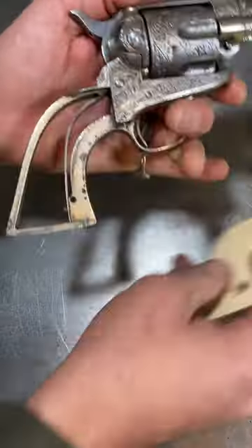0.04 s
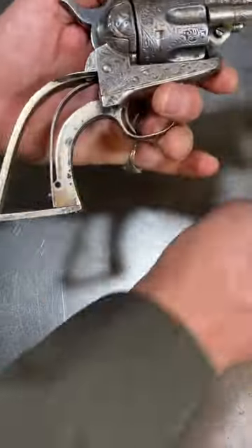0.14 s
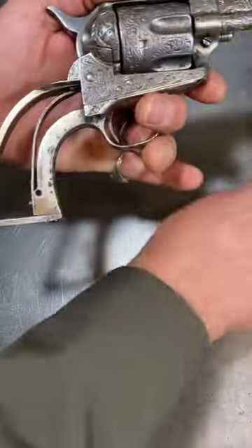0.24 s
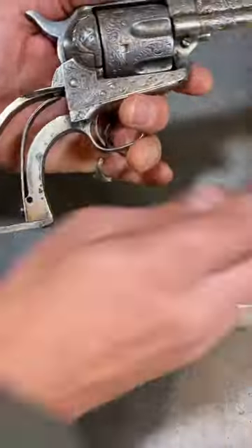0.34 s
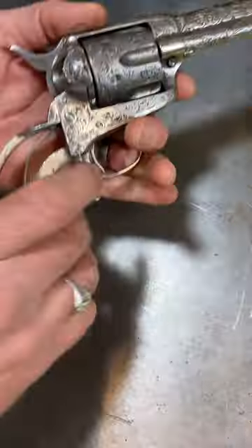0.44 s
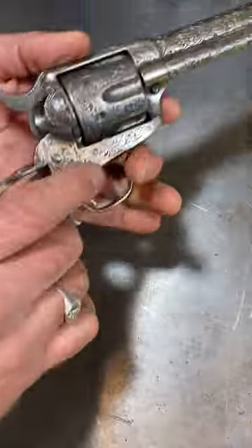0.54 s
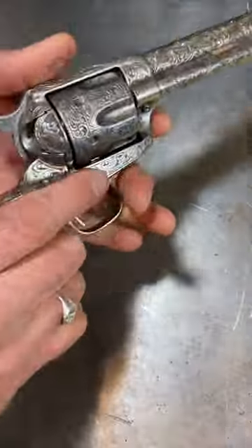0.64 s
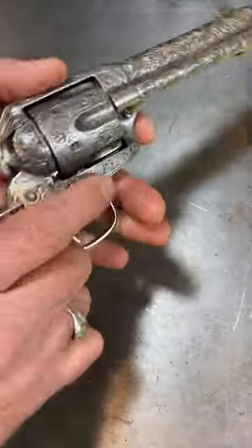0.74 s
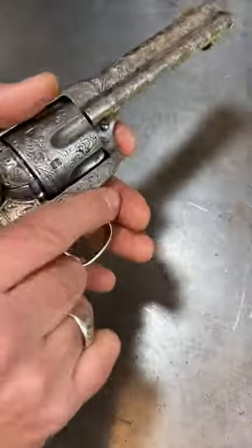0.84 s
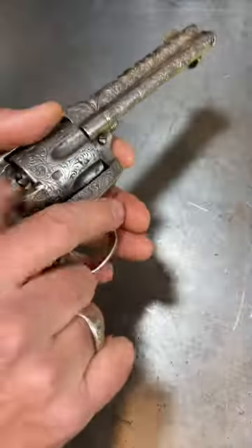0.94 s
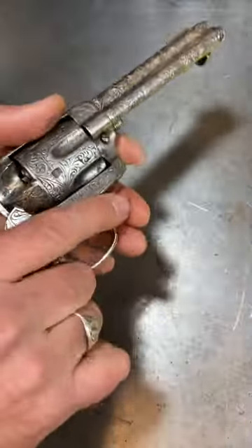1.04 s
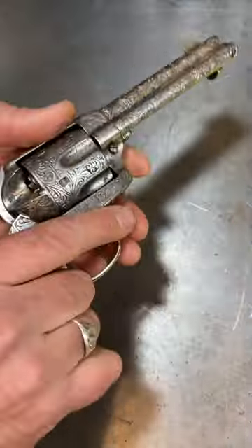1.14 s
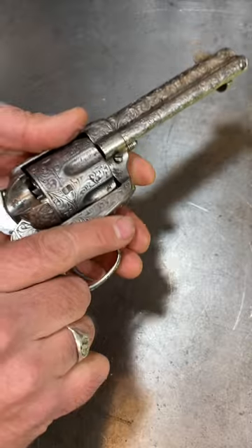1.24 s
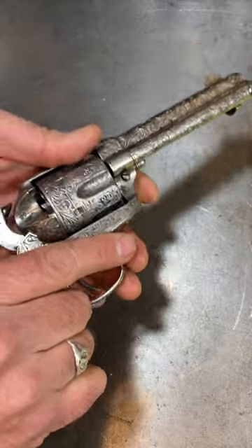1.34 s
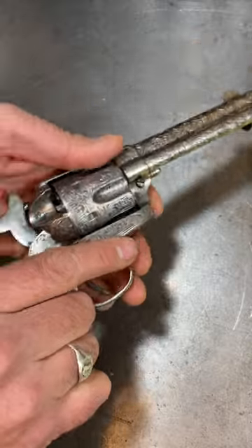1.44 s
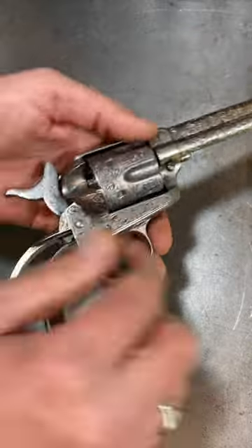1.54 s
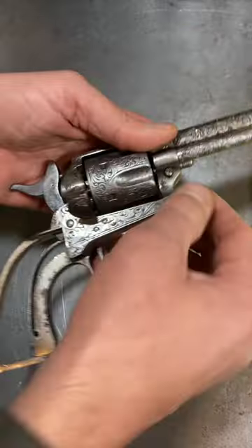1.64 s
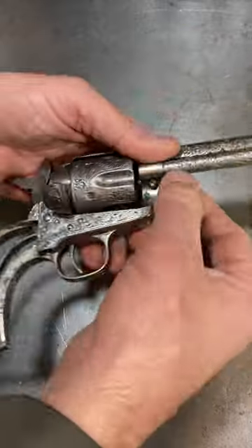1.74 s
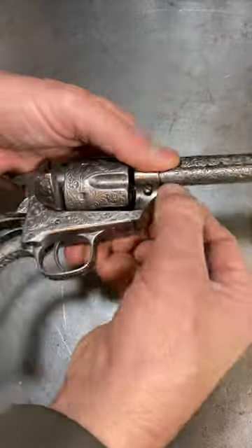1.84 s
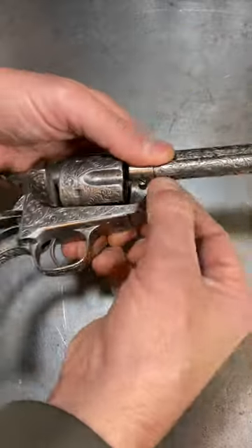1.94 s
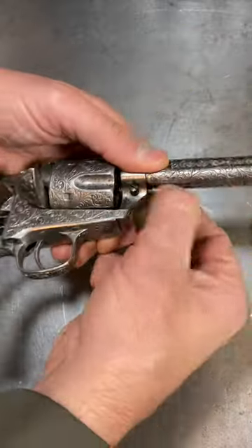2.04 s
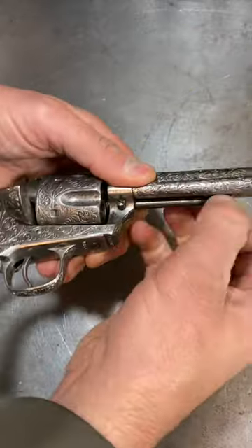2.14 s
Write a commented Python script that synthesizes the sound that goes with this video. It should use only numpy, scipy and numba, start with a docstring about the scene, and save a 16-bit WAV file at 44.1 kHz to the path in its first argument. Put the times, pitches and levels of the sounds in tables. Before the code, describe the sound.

Revolver disassembly, heard close in stereo in a small workshop with faint low hum. Sleeve cloth swishes; at 0.2 s a part smacks a steel bench with a short damped clatter, slightly right. Sharp, bright lockwork snaps at 0.9, 1.17 and 1.35 s, with fainter ticks between and soft hand bumps. Cloth brushes at 1.6 s with a light tick; from 2.0 s a pin scrapes out in faint, thin metallic strokes.

```python
"""A hum and a swishing sleeve open the scene: a revolver is taken apart by hand in a small workshop.
A part thuds on a steel bench: a hard smack, damped bench modes and a dense noise clatter.
The hand-damped lockwork snaps three times with lighter ticks between: noise cracks plus frame modes.
A steel pin slides out of the frame: short strokes of hiss that drive its resonances.
Soft bumps of the hands, room noise and a low rumble fill the rest."""
import sys
import numpy as np
from scipy import signal
from scipy.fft import rfft, irfft
from scipy.io import wavfile
from scipy.ndimage import uniform_filter1d
from numba import njit

SR = 44100
rng = np.random.default_rng(int(sys.argv[2]) if len(sys.argv) > 2 else 0)


def to_wav(s):
    """Save 16-bit WAV."""
    ch = np.atleast_2d(s).T  # columns
    pcm = np.round(np.clip(ch, -1, 1) * 32767)  # PCM
    wavfile.write(sys.argv[1], SR, pcm.astype(np.int16))


N = 97020
T = np.arange(N) / SR
HZ = np.maximum(np.fft.rfftfreq(N, 1 / SR), 1)


def undb(db):
    """Decibels to gain."""
    return 10 ** (np.asarray(db) / 20)


def unit(x):
    """Scale to rms 1."""
    return x / np.sqrt(np.mean(x ** 2))


def blow(x):
    """Scale to mean channel energy 1."""
    return unit(x) / np.sqrt(N)


def over_hz(points):
    """Join (f/Hz, value) points on a log-frequency axis."""
    hz, value = np.array(points).T
    return np.interp(np.log(HZ), np.log(hz), value)


def over_time(points):
    """Join (t/s, value) points linearly."""
    s, value = np.array(points).T
    return np.interp(T, s, value)


def colour(x, points):
    """Minimum-phase filter through (f/Hz, gain/dB) points, by folding the cepstrum."""
    cepstrum = irfft(np.log(undb(over_hz(points))), N)
    fold = 1 + np.sign(N / 2 - np.arange(N))
    fold[0] = 1
    response = np.exp(rfft(cepstrum * fold))
    return irfft(rfft(x) * response, N)


def low_cut(x, hz):
    """Third-order high-pass."""
    return signal.sosfilt(signal.butter(3, hz, "high", fs=SR, output="sos"), x)


@njit
def band(x, hz, share):
    """State-variable band-pass with moving centre and width (share of centre)."""
    y, b, l = np.empty(len(x)), 0., 0.
    for i in range(len(x)):
        g = np.tan(np.pi * hz[i] / SR)
        v = (b + g * (x[i] - l)) / (1 + g * (g + share[i]))
        b, l, y[i] = 2 * v - b, l + 2 * g * v, share[i] * v
    return y


def resonance(hz, width_hz):
    """Complex response of one resonance, 1 at its centre."""
    return 1 / (1 + 1j * (HZ ** 2 - hz ** 2) / (HZ * width_hz))


def pan(x, right_db):
    """Lean a stereo sound to the right."""
    return x * undb(right_db * np.array([[-1], [1]]) / 2)


def fade(t60_s):
    """Exponential decay, -60 dB at t60_s."""
    return np.exp(-np.log(1000) * T / t60_s)


def ring_mode(hz, db, t60_s):
    """Decaying sine of one struck mode."""
    return undb(db) * fade(t60_s) * np.sin(2 * np.pi * hz * T)


def place(x, s):
    """Delay channel rows to a start time."""
    return np.pad(x, ((0, 0), (int(s * SR), 0)))[:, :N]


def flutter(rate_hz):
    """Smooth random wander with rms 1: noise averaged twice over 1 / rate_hz."""
    size = max(int(SR / rate_hz), 1)
    return unit(uniform_filter1d(uniform_filter1d(rng.standard_normal(N), size), size))


def swell(s, rise_s, fall_s, db):
    """Level of one stroke: Gaussian rise and fall."""
    return undb(db) * np.exp(-((T - s) / np.where(T < s, rise_s, fall_s)) ** 2)


def swells(rows):
    """Overlapping strokes, added in power."""
    return np.sqrt(sum(swell(*row) ** 2 for row in rows))


# left-right correlation of the noise, opposed in the top band: f/Hz, correlation (clipped to -1..1 in use)
NOISE_CORRELATION = [(25, 1), (60, 1), (250, 0.94), (500, 0.59), (800, 0.38), (1500, -0.16), (3000, 0.12),
                     (6000, 0.094), (10500, .5), (12300, 0.023), (13300, -1.79)]


def diffuse():
    """White stereo noise with that left-right correlation, by weighting mid and side."""
    correlation = np.clip(over_hz(NOISE_CORRELATION), -1, 1)
    mid, side = rfft(rng.standard_normal((2, N))) * np.sqrt([1 + correlation, 1 - correlation])
    return unit(irfft(np.array([mid + side, mid - side]), N))


# machine hum: t/s, f/Hz, level/dB
MACHINE_HUM = [(0, 140.8, -55), (0.122, 138.8, -53), (0.43, 138.4, -53), (0.72, 139.5, -49),
               (1.0, 139.3, -53), (1.22, 137.3, -60.5), (1.4, 137.4, -68), (1.901, 136.2, -70),
               (2.2, 137.5, -57.5)]
# room noise spectrum: f/Hz, gain/dB
AIR_TONE = [(100, -1.5), (220, 0), (350, -4), (600, -6.5), (1200, -12.5), (3000, -13), (10000, -20.5),
            (16000, -16.5)]
# room noise and whine: t/s, level/dB
AIR_LEVEL = [(0, -59.5), (0.4, -56.5), (0.68, -65), (0.85, -57.5), (1.08, -68.5), (1.3, -75.5),
             (1.45, -63.5), (1.8, -77), (2.2, -64)]
# rumble spectrum: f/Hz, gain/dB
RUMBLE_TONE = [(25, -11.5), (50, -27), (100, 4), (150, 2.5), (220, -10.5), (500, -46)]
# rumble: t/s, level/dB
RUMBLE_LEVEL = [(0, -64.5), (0.6, -60), (1.15, -62), (1.5, -69), (2.2, -66.5)]
HUM_OCTAVE_DB = -23.5


def workshop():
    """Wavering two-partial hum and faint whine, over coloured room noise and low rumble."""
    s, hz, db = np.array(MACHINE_HUM).T
    phase = 2 * np.pi * np.cumsum(np.interp(T, s, hz)) / SR
    partials = np.sin(phase) + undb(HUM_OCTAVE_DB) * np.sin(2 * phase)
    hum = np.sqrt(2) * partials * undb(np.interp(T, s, db) + 0.33 * flutter(53))
    whine = 0
    for whine_hz, rel_db in [(479, -13.5), (614, -20)]:  # dB re room noise
        whine = whine + np.sin(2 * np.pi * whine_hz * T) * undb(rel_db + 2 * flutter(23))
    air = (unit(colour(diffuse(), AIR_TONE)) + whine) * undb(over_time(AIR_LEVEL))
    rumble = unit(colour(diffuse(), RUMBLE_TONE)) * undb(over_time(RUMBLE_LEVEL))
    return hum + air + rumble


# soft bumps of the hands on the gun: t/s, level/dB, f/Hz
HAND_BUMPS = [(0.109, -50.5, 217), (0.264, -42, 111), (0.575, -59, 100), (0.808, -55, 172),
              (0.902, -51, 99.2), (1.027, -43, 124.4), (1.052, -41.5, 99), (1.673, -56, 199)]
BUMP_S = 0.014  # Gaussian half-width at 1/e


def hands():
    """Dull bumps as the grip shifts: Gaussian-windowed low cosines."""
    out = 0
    for s, db, hz in HAND_BUMPS:
        window = np.exp(-((T - s) / BUMP_S) ** 2)
        out = out + undb(db) * window * np.cos(2 * np.pi * hz * (T - s))
    return out


# sleeve swishes: peak t/s, rise/s, fall/s, level/dB
SLEEVE_SWISHES = [(0.085, 0.046, 0.09, -47.5), (0.15, 0.055, 0.033, -47.5), (0.325, 0.083, 0.088, -47),
                  (0.86, 0.098, 0.094, -61.5), (1.47, 0.23, 0.27, -62.5), (1.60, 0.057, 0.056, -46.5),
                  (1.655, 0.055, 0.047, -51), (1.83, 0.13, 0.071, -65), (2.02, 0.097, 0.22, -64)]
# cloth hiss spectrum: f/Hz, gain/dB
CLOTH_TONE = [(100, -4), (220, 0.5), (450, -4.5), (900, -2), (1600, -2), (2700, -6), (4500, -3.5),
              (6000, -4.5), (10500, -3.5), (13000, -5), (16000, -23)]
# weave rasp, pitch follows the speed of the rub: t/s, f/Hz, level/dB, width/share of pitch (per pass)
WEAVE_RASP = [(0.02, 890.1, -90, 0.36), (0.079, 1510, -46, 0.76), (0.162, 1560, -51.5, 0.93),
              (0.27, 1300, -52.5, 0.7), (0.302, 1730, -48, 0.89), (0.312, 2400, -46, 0.17),
              (0.328, 2600, -49.5, 0.47), (0.349, 1910, -58, 0.46), (0.47, 1200, -75.5, .6),
              (1.44, 933, -91, 0.67), (1.577, 1415, -55.5, 0.32), (1.605, 1620, -51, 0.34),
              (1.649, 930, -55, 0.97), (1.67, 580, -64, 0.54), (1.74, 463, -82, .6)]
CLOTH_SCUFF_DB, SCUFF_HZ = 1.04, 78
SNAG_PER_S, SNAG_DB, SNAG_DECAY_S = 90, 4.5, 0.0016  # threads that catch and let go


def sleeve():
    """Cloth on cloth: noise roughened by scuffs and snags, plus a weave rasp in a gliding band."""
    catches = 1. * (rng.random(N) < SNAG_PER_S / SR)
    snags = signal.fftconvolve(catches, np.exp(-T / SNAG_DECAY_S))[:N]
    grain = undb(CLOTH_SCUFF_DB * flutter(SCUFF_HZ) + SNAG_DB * np.minimum(snags, 1))
    hiss = unit(colour(diffuse() * grain, CLOTH_TONE)) * swells(SLEEVE_SWISHES)
    s, *columns = np.array(WEAVE_RASP).T
    pitch_hz, db, share = (np.interp(T, s, column) for column in columns)
    rasp = np.array([band(band(x, pitch_hz, share), pitch_hz, share) for x in diffuse() * grain])
    even_rasp = unit(rasp / np.sqrt(pitch_hz * share))  # power evened over bandwidth
    return hiss + even_rasp * undb(db)


# part lands and rocks: t/s, level/dB, contact/s
BENCH_KNOCKS = [(0.2004, -21.5, 0.0002), (0.216, -17.5, 0.0015)]
# bench top modes: f/Hz, level/dB, t60/s
BENCH_MODES = [(106, -9, .25), (147, -6.5, 0.047), (178.6, -30, 0.84), (255.6, -3.5, 0.135),
               (321, -18.5, 0.21), (390.2, -16.5, 0.33), (417, -24, 0.066), (463, -16, 0.3),
               (568, -9.5, 0.12), (619, -25, 0.34), (698, -17, 0.23), (738, -26, 0.27), (812, -18.5, 0.23),
               (884, -30, .16), (957, -8, 0.08), (1105, -15, 0.13), (1137, -12, 0.11), (1287, -12.5, 0.11),
               (1406, -23, 0.1006), (1640, -15, 0.072), (1740, -12.5, 0.053)]
# clatter spectrum: f/Hz, gain/dB
CLATTER_TONE = [(50, -60), (100, -34), (250, 4.5), (600, -2), (1250, -1), (1750, -9.5), (2600, -16),
                (5000, -26), (10000, -24), (16000, -58)]
# first-touch crunch spectrum: f/Hz, gain/dB
CRUNCH_TONE = [(100, -4.5), (500, 20), (1200, -5), (2300, 10), (4000, -2), (10000, -4.5), (16000, -14)]
# hard first-touch spectrum: f/Hz, gain/dB
SMACK_TONE = [(150, -15), (500, -5), (1000, 5), (1700, 4.5), (2100, -19), (2600, 0), (3600, -29),
              (8000, -20), (16000, -38)]
# lean to the right: f/Hz, right re left/dB
BENCH_RIGHT = [(200, 1.5), (600, -0.5), (1200, 4), (2300, 5), (5000, -0.5)]
LANDS_S, SMACK_DB = .2003, -10.5
CRUNCH_DB, CRUNCH_T60_S = -5.5, 0.068
CLATTER_DB, CLATTER_T60_S, CLATTER_CENTRE_DB = -3.5, 0.16, -0.5
BENCH_CUT_HZ = 199  # the top radiates little below this


def bench():
    """Landing part: smack, crunch and clatter, with bench modes driven by half-sine contact pushes."""
    # random polarity for each mode spreads the ring's energy evenly
    signs = np.sign(rng.standard_normal(len(BENCH_MODES)))
    modes = sum(sign * ring_mode(*mode) for sign, mode in zip(signs, BENCH_MODES))
    ring = low_cut(modes, BENCH_CUT_HZ)
    spread = diffuse() + undb(CLATTER_CENTRE_DB) * rng.standard_normal(N)
    clatter = undb(CLATTER_DB) * blow(colour(spread * fade(CLATTER_T60_S), CLATTER_TONE))
    crunch = undb(CRUNCH_DB) * blow(colour(diffuse() * fade(CRUNCH_T60_S), CRUNCH_TONE))
    smack = undb(SMACK_DB) * blow(colour(signal.unit_impulse(N), SMACK_TONE))
    out = place(smack + clatter + crunch, LANDS_S)
    for s, db, contact_s in BENCH_KNOCKS:
        push = np.sin(np.pi * T[T < contact_s] / contact_s)
        knock = signal.fftconvolve(ring, push / push.sum())
        out = out + undb(db) * place(knock[None], s)
    return irfft(pan(rfft(out), over_hz(BENCH_RIGHT)), N)


# pin strokes: peak t/s, rise/s, fall/s, ring/dB, hiss/dB, strongest f/Hz
PIN_STROKES = [(2.024, 0.0014, .003, -59, -69, 2650), (2.0542, 0.002, 0.0016, -63, -61, 3472),
               (2.067, 0.018, 0.0058, -57, -52.5, 5400), (2.0704, .001, .002, -51, -55, 2900),
               (2.087, 0.01, 0.011, -50, -48.5, 6300), (2.104, 0.0064, 0.0041, -47.5, -48.5, 3150),
               (2.1114, 0.0025, 0.005, -52.5, -47.5, 4200), (2.122, .003, 0.0025, -56.5, -58, 3570),
               (2.1513, 0.0021, 0.0022, -51.5, -58, 2633)]
# pin resonances: f/Hz, width/Hz, level/dB
PIN_RESONANCES = [(2500, 91, 6.5), (3170, 370, -4), (3520, 130, -1.5), (4550, 220, 1), (4930, 130, -6),
                  (5740, 270, -6), (8200, 200, -6), (9170, 110, 4)]
# pin hiss spectrum: f/Hz, gain/dB
PIN_HISS_TONE = [(200, -14), (1500, 1), (5000, -8.5), (10000, -0.5), (13000, -4), (16000, 3)]
PIN_GRAIN_DB, GRAIN_HZ, PIN_DULL_HZ = 2, 1300, 9000
PIN_FOCUS_DB_PER_OCTAVE = 8  # fall away from a stroke's strongest pitch
PIN_DETUNE = 0.013  # rms share of random detuning of each resonance, per stroke


def pin():
    """Pin sliding in its bore: each grainy stroke hisses and excites its resonances in a new mix."""
    rub = unit(diffuse() * undb(PIN_GRAIN_DB * flutter(GRAIN_HZ)))
    hiss_rows = [(s, rise, fall, hiss_db) for s, rise, fall, _, hiss_db, _ in PIN_STROKES]
    out = colour(rub, PIN_HISS_TONE) * swells(hiss_rows)
    for s, rise, fall, ring_db, _, focus_hz in PIN_STROKES:
        detunes = 1 + PIN_DETUNE * rng.standard_normal(len(PIN_RESONANCES))
        body = 0
        for (hz, width_hz, db), detune in zip(PIN_RESONANCES, detunes):
            body = body + undb(db) * resonance(hz * detune, width_hz)
        focus = undb(-PIN_FOCUS_DB_PER_OCTAVE * abs(np.log2(HZ / focus_hz)))
        body = body * focus / (1 + (HZ / PIN_DULL_HZ) ** 2)
        body = body / np.sqrt(np.mean(abs(body) ** 2))
        drive = rub[0] * swell(s, rise, fall, ring_db)
        out = out + irfft(rfft(drive) * body, N)
    return out


# crack before its spectrum is flattened; reshaping then alters the decay
CRACK_DB, CRACK_SEED_RISE_S, CRACK_SEED_T60_S = -1.5, 0.00018, .008


def even_burst(t60_s, count=6):
    """Short noise burst, repeatedly whitened and re-windowed so that it favours no pitch."""
    size = int(.012 * SR)
    shape = (fade(t60_s) * (1 - np.exp(-T / CRACK_SEED_RISE_S)))[:size]
    x = rng.standard_normal(size) * shape
    for _ in range(count):
        white = irfft(np.exp(1j * np.angle(rfft(x))), size)
        x = white * np.sqrt(shape)
    return blow(np.pad(x, (0, N - size)))


# lockwork clicks: t/s, level/dB, room re direct/dB, then gain/dB at:
# body 1150 Hz, knock 2450 Hz, rings 3200, 4200, 5600 Hz, edge 9900 Hz, sheen 12300 Hz, top 15000 Hz
LOCK_CLICKS = [(0.8906, -1.5, -12, -3, -14.5, -2, -12.5, -4.5, 12.5, 10.5, 10),
               (0.9569, -30, -1, 6.5, -11, 9.5, 9, 1, 2, 0.5, 3),
               (0.9693, -41, -14, -5, -10, 10, 19, -4, -5, -10, -19),
               (1.166, -2.5, -11, -9.5, -8, -9.5, 4, -3, -4, 3.5, 2.5),
               (1.1730, -22, -17, -33, -3, -15, 0, 1, -2, -7, -8),
               (1.2525, -41, -3, 1, 11, -9, 9, -5, -20, -12, -13),
               (1.3372, -26, -31.5, -22, -20, -24, -11, -5, -3, -6, 1),
               (1.3504, 1, -14, -15, -10, -12.5, -5, -3.5, -13, -3.5, -3.5),
               (1.4155, -35, -13, -18, -12, -6, -10, 3, -3, 6, 7),
               (1.4190, -17, -18, -0.5, -15, -18, -16, -0.5, -9, -15, -14),
               (1.6007, -17, -5, -6, -28, -15, 8, 1, -2, -3, -18.5),
               (1.8435, -40, 3.5, -21, 11.5, 13.5, 10.5, 8, -0.5, 10, 2)]
# frame and cylinder modes, damped by the hand: f/Hz, level/dB, t60/s
FRAME_MODES = [(2446, -16.5, 0.025), (3120, 1.5, 0.007), (3555, 2.5, 0.0077), (4050, -3.5, 0.01),
               (4700, -8, 0.0076), (5370, -9, 0.013), (6250, -10.5, 0.02), (7030, -7.5, 0.016),
               (7750, -2.5, 0.0084), (8600, -1, 0.013), (9920, 0, 0.0098), (10750, 3, 0.0068),
               (11560, -1, 0.012), (12340, 3.5, 0.0079), (13100, -0.5, 0.012), (14260, -0.5, 0.016),
               (15050, -1.5, 0.01)]
# room tail spectrum: f/Hz, gain/dB
ROOM_TONE = [(500, 1.5), (2000, -1.5), (7000, 2), (10500, -2.5), (15000, -7.5)]
# direct sound: f/Hz, phase by which left leads/rad
PORT_PHASE = [(4500, 0), (6500, 1), (8500, 1.66), (10000, -0.6), (12200, 1.96), (14500, 3.5)]
RING_RISE_S = 0.0002
ROOM_T60_S, ROOM_RISE_S = 0.095, 0.0025


def lockwork():
    """Each click cracks, rings the frame for a few milliseconds and dies away in a stereo room tail."""
    out = 0
    ports = np.exp(.5j * over_hz(PORT_PHASE) * np.array([[1], [-1]]))
    attack = 1 - np.exp(-T / RING_RISE_S)
    # alternate polarity from mode to mode
    modes = blow(attack * sum((-1) ** k * ring_mode(*mode) for k, mode in enumerate(FRAME_MODES)))
    room_shape = fade(ROOM_T60_S) * (1 - np.exp(-T / ROOM_RISE_S))
    for s, db, room_db, body, knock, low_ring, mid_ring, high_ring, edge, sheen, top in LOCK_CLICKS:
        direct = blow(modes + undb(CRACK_DB) * even_burst(CRACK_SEED_T60_S))
        room = blow(colour(diffuse() * room_shape, ROOM_TONE))
        at_ports = irfft(rfft(place(direct[None], s)) * ports, N)
        heard = at_ports + undb(room_db) * place(room, s)
        tone = [(200, body - 14), (600, body - 4), (1150, body), (1900, (body + knock) / 2 - 4),
                (2450, knock), (3200, low_ring), (4200, mid_ring), (5600, high_ring),
                (7400, 0), (9900, edge), (12300, sheen), (15000, top)]
        out = out + undb(db) * colour(heard, tone)
    return out


NOTCH_HZ, NOTCH_WIDTH_HZ, NOTCH_DEPTH = 2726, 100, 0.59  # narrow dip in lockwork, bench and sleeve


def scene():
    """Lockwork near centre, bench thud to the right, sleeve a little left, all in the room's hum."""
    background = workshop() + hands()
    near = pan(sleeve(), right_db=-1.5) + bench() + pan(lockwork(), right_db=0.7)
    notch = 1 - NOTCH_DEPTH * resonance(NOTCH_HZ, NOTCH_WIDTH_HZ)
    return background + pin() + irfft(rfft(near) * notch, N)


LOW_CUT_HZ, TOP_HZ = 73, 16200


def record(dry):
    """Band limits of the pickup: high-pass thins the deep bass, steep elliptic low-pass cuts the top."""
    thinned = low_cut(dry, LOW_CUT_HZ)
    return signal.sosfilt(signal.ellip(8, .2, 70, TOP_HZ, fs=SR, output="sos"), thinned)


dry = scene()
out = record(dry)
to_wav(out)
```